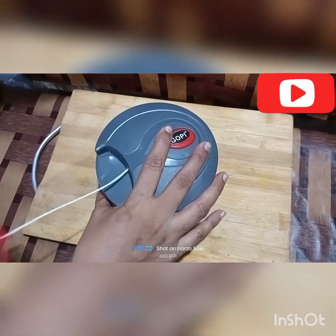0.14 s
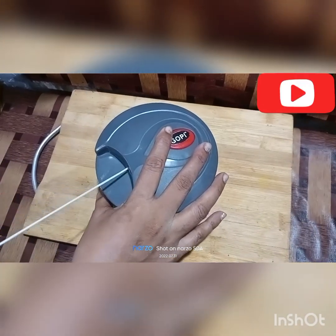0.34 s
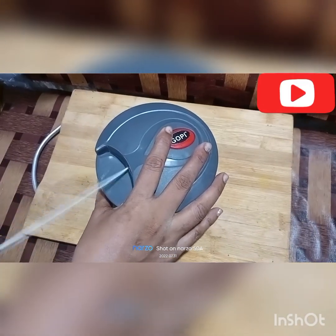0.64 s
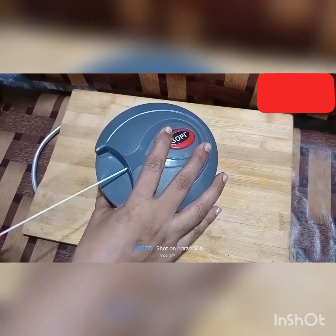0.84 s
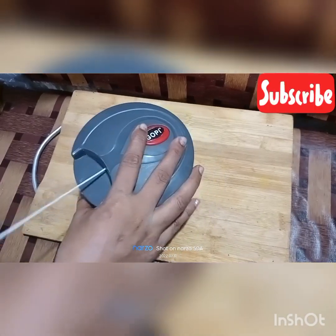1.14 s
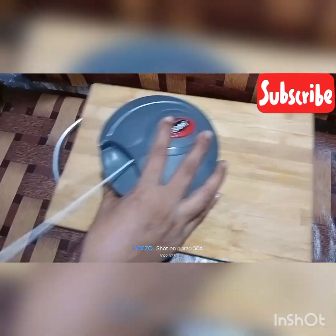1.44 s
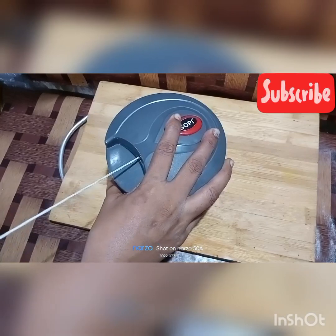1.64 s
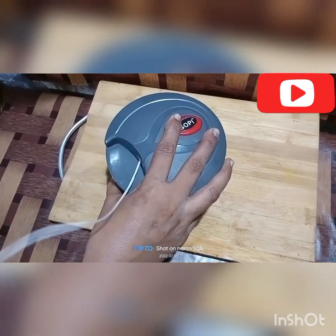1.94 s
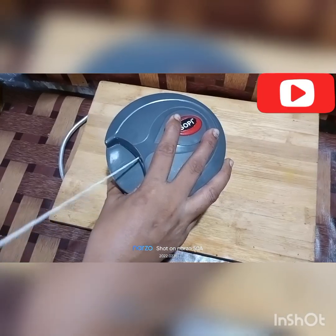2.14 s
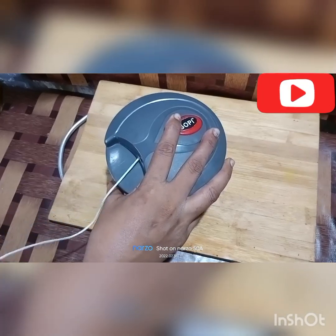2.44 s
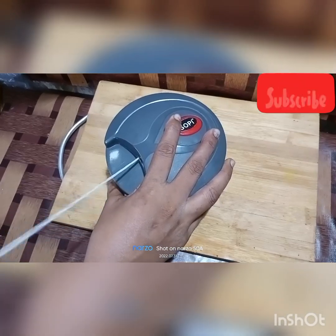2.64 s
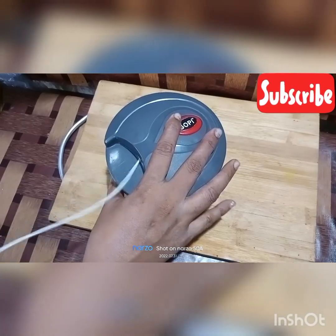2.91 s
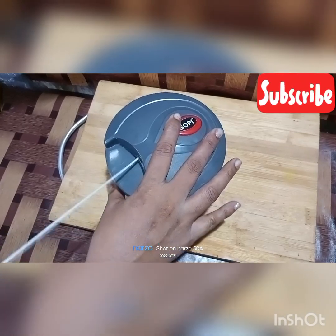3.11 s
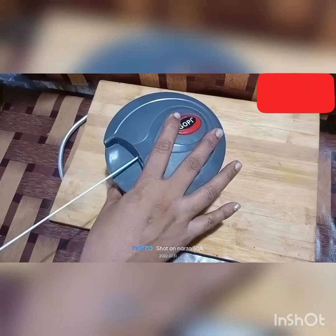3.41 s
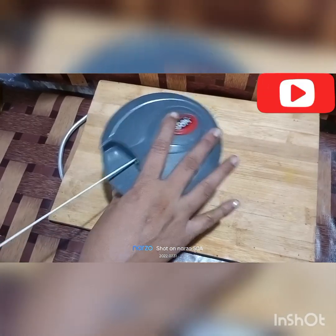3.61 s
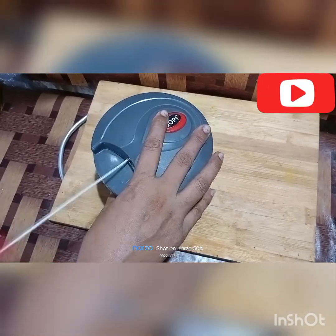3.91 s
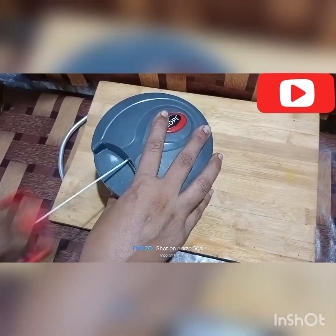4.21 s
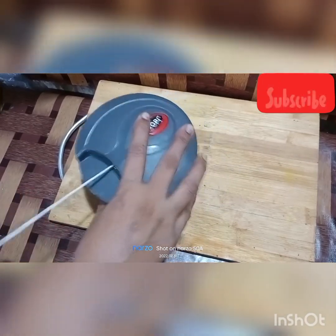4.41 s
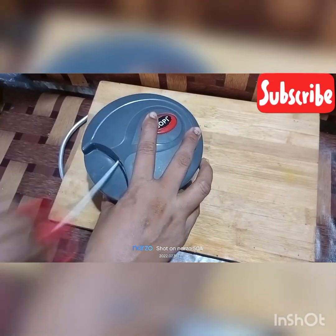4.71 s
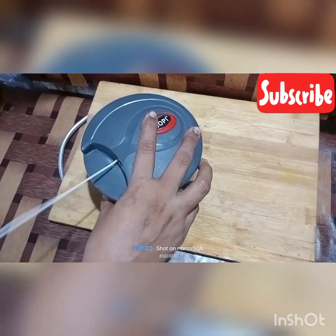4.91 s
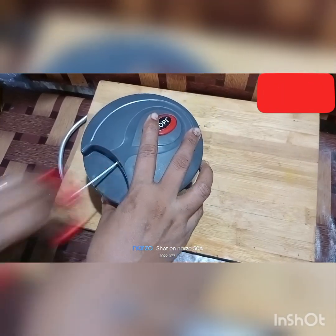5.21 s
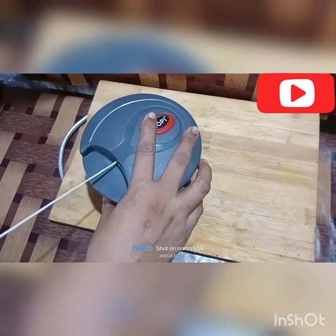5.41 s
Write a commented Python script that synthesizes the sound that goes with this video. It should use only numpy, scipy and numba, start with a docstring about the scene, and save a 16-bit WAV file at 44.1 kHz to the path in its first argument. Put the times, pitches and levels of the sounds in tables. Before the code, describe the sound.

Heard very close in a quiet kitchen, a pull-cord chopper spins in short uneven bursts. Hard pieces rattle and knock inside the plastic bowl, blades swish and tick brightly, and the bowl bumps a wooden board with low thuds. Small cord squeaks appear between pulls. The middle is sparser, then knocks strengthen and steel rings briefly near the end. Dry mono sound, faint room hiss and hum.

```python
"""A pull-cord chopper with a plastic bowl, heard from close by on a wooden board in a quiet kitchen.
From the first moment bursts of spin rattle pieces in the bowl, with knocks, ticks and swishing blades.
Soon the bowl rocks and bumps on the board and the cord squeaks; past the middle the steel rings faintly,
and near the end it rings loudest. Noise-driven resonators make the rattle, rumble, swish and room tone;
decaying sines and noise make the blows; gliding partials make the squeaks."""
import sys
import numpy as np
from scipy import signal
from scipy.fft import rfft, irfft
from scipy.io import wavfile
from scipy.ndimage import uniform_filter1d
from numba import njit

SR = 44100
rng = np.random.default_rng(int(sys.argv[2]) if len(sys.argv) > 2 else 0)


def store_wav(level_fs):
    """Save 16-bit WAV to argv[1]."""
    pcm = np.round(np.clip(np.atleast_2d(level_fs), -1, 1) * 32767)
    wavfile.write(sys.argv[1], SR, pcm.T.astype(np.int16))


N = 244755

# Bursts of spin as the cord is pulled or let back. Each row: time of full speed in seconds, run-up in
# seconds, hold in seconds, then rattle, swish and top swish levels in dB.
SPINS = [(0.03, 0.088, 0.019, -45, -50, -60), (0.28, 0.015, 0.09, -43.5, -55, -63),
         (0.413, 0.024, 0.032, -56.5, -66.5, -71), (0.544, 0.081, .003, -50, -61, -72),
         (0.597, 0.029, .035, -38.5, -43.5, -49), (0.681, 0.01, 0.0029, -39, -41, -54),
         (0.84, 0.038, 0.013, -54.5, -59, -80), (0.906, .06, 0.024, -49, -44.5, -52),
         (0.993, 0.025, 0.03, -66, -55, -68), (1.165, 0.05, 0.01, -46, -48.5, -63),
         (1.365, 0.12, 0.033, -72, -62.5, -61), (1.426, 0.019, 0.0071, -38, -40, -49),
         (1.466, .02, 0.073, -42, -56, -66), (1.676, 0.035, .003, -50, -64, -67),
         (1.99, .03, 0.036, -46.5, -57, -59), (2.061, 0.043, .003, -67, -56, -72),
         (2.2, .05, 0.039, -52.5, -59.5, -68), (2.56, 0.1, 0.049, -53.5, -57, -63),
         (2.627, 0.041, 0.056, -69, -59.5, -63), (2.785, 0.1, 0.015, -57.5, -57, -66),
         (3.069, 0.029, 0.054, -48, -54.5, -60), (3.14, .02, .003, -58, -57, -60),
         (3.295, 0.087, 0.092, -51.5, -58.5, -59), (3.371, 0.12, 0.073, -48.5, -49, -55),
         (3.605, 0.039, 0.054, -59, -65.5, -71), (3.737, 0.14, .012, -58, -52.5, -54),
         (3.848, 0.084, .003, -51.5, -60, -75), (3.882, .02, 0.051, -44.5, -40.5, -53),
         (3.955, 0.023, 0.0027, -44.5, -56.5, -55), (4.076, .025, 0.039, -72, -58, -74),
         (4.178, 0.062, .003, -51, -54.5, -66), (4.458, 0.13, 0.0025, -53, -57, -63),
         (4.669, 0.031, 0.037, -58, -64, -69), (4.752, 0.059, 0.0039, -46.5, -52, -65),
         (4.934, 0.052, 0.021, -41, -46, -52), (4.995, 0.022, 0.026, -51, -58, -70),
         (5.167, 0.059, 0.03, -57, -67, -75), (5.204, 0.018, 0.097, -45, -52.5, -58),
         (5.436, 0.023, .003, -75, -58.5, -76), (5.476, 0.018, 0.048, -34.5, -45.5, -54)]
RUN_UP_DB = 25  # climb over one run-up time
# Rates at which a coasting burst dies. In order: rattle, swish and top swish, in dB per second.
COAST_DB_PER_S = [325, 392, 328]
# The bowl rocks on the board. Each row: time of full level in seconds, hold in seconds, level in dB,
# rumble centre in Hz.
ROCKS = [(.004, 0.0089, -56, 201), (0.04, 0.017, -53.5, 208), (0.316, 0.069, -43, 246),
         (0.417, 0.018, -46.5, 210), (.547, .02, -48.5, 232), (0.593, 0.026, -40, 286),
         (0.667, 0.034, -44.5, 186), (0.76, 0.048, -56, 155), (.92, 0.015, -52, 200),
         (1.18, .003, -55, 347), (1.37, 0.025, -61, 200), (1.442, 0.084, -45.5, 256),
         (1.687, .003, -57, 268), (1.999, 0.052, -45, 282), (2.213, 0.081, -50.5, 181),
         (2.386, .003, -59, 187), (2.564, 0.025, -45, 193), (2.653, .045, -52, 356),
         (2.772, 0.037, -47, 210), (2.865, .13, -60, 171), (3.085, 0.032, -42, 315),
         (3.294, 0.046, -45, 198), (3.39, 0.066, -57, 200), (3.508, 0.063, -50.5, 170),
         (3.727, .003, -59.5, 243), (3.875, .003, -49.5, 276), (3.95, .012, -48, 242),
         (4.138, 0.089, -59, 273), (4.424, .03, -61, 249), (4.673, .02, -54, 238), (4.75, 0.0038, -46, 344),
         (4.918, 0.07, -51, 242), (5.191, 0.098, -51, 360), (5.433, 0.018, -44, 267),
         (5.483, 0.046, -34.5, 290)]
ROCK_RISE_S, ROCK_FALL_DB_PER_S = 0.051, 276
ROCK_RATTLE_DB = -18.5  # lowest bowl modes relative to the rumble
# Resonant modes of the bowl. Each row: frequency in Hz, width in Hz, relative level in dB.
BOWL = [(625.4, 40, -10), (714.7, 50.5, -2), (800.3, 45, -1.5), (972, 41, -9), (1124, 350, -7.5),
        (1256, 18, -5), (1388, 120, -5.5), (1600, 176, -3), (1696, 88, -3), (1931, 120, -10.5),
        (2114, 110, -11), (2334, 14, -22)]
# Resonant modes of the board. Each row: frequency in Hz, width in Hz, relative level in dB before
# weighting by distance from the rumble centre.
BOARD = [(65, 25, -21), (104, 18, -0.5), (143.4, 5.7, -1.5), (193.9, 18.2, 1), (288.3, 21, -4.5),
         (361.6, 27, 1.5), (389, 6.7, -8.5)]
# Spectral shape of the swish. Each row: frequency in Hz, relative density in dB per Hz.
SWISH = [(1800, -23), (2400, 2), (3140, 4), (4300, 3), (4700, 0), (5400, 7.5), (7300, 5.5), (8000, -3.5),
         (8900, 7.5), (10200, -23.5), (14000, -9)]
# Pieces knock the bowl. Each row: start in seconds, peak in dB, low ring in Hz, high ring in Hz,
# high ring in dB relative to the low ring.
KNOCKS = [(0.026, -38, 600, 1240, 10), (0.051, -30, 680, 1896, 14), (0.275, -28, 1090, 1696, 8.5),
          (0.319, -34, 680, 1670, 28), (0.411, -38.5, 647, 2280, 1), (0.548, -39.5, 805, 1700, -3),
          (0.597, -29, 757, 1690, -9), (0.63, -28.5, 701, 1330, -6), (0.679, -27.5, 593, 1580, 2),
          (0.845, -44.5, 588, 1630, 3), (0.927, -34, 578, 2290, 7), (1.133, -43.5, 803, 1706, 9),
          (1.423, -33, 770, 1270, 13), (1.466, -27.5, 733, 1250, 7), (1.507, -31.5, 740, 2040, 5),
          (1.54, -29, 704, 2190, 5), (1.675, -33, 706, 1760, -3), (1.973, -38, 765, 1676, 7),
          (2.238, -39, 710, 1675, -15), (2.55, -38.5, 760, 1245, 2), (2.75, -43.5, 750, 1170, 5),
          (2.793, -34.5, 805, 1620, -8), (3.101, -30, 790, 1190, -22), (3.33, -41.5, 783, 1630, -13),
          (3.371, -36, 742, 1250, -2), (3.668, -42.5, 611, 1355, -10), (3.829, -46, 696, 1310, -13),
          (3.874, -30, 1000, 1285, 1), (4.165, -40, 702, 1670, 0), (4.733, -34, 505, 1280, -11.5),
          (4.904, -32, 550, 1630, 4.5), (5.175, -42, 595, 1300, -16), (5.201, -26, 566, 1800, 7.5),
          (5.281, -22.5, 555, 1950, -6.5), (5.475, -24, 662, 1920, 3)]
# Decay time of a -30 dB blow, and how many dB harder halve it.
KNOCK_T60_S, KNOCK_HALVING_DB = 0.084, 21
TICK_T60_S, TICK_HALVING_DB = 0.02, 25
# Blades tick on hard bits. Each row: start in seconds, peak of the body in dB, top band in dB relative to
# the main body band, body centre in Hz.
TICKS = [(0.0172, -39.5, 5, 4530), (0.596, -34, -4, 5200), (0.606, -31.5, 7, 8740), (0.631, -29, -20, 4900),
         (0.6804, -32, -18, 7700), (0.6877, -24.5, -1.5, 5500), (0.8455, -37, -32, 7100),
         (0.8983, -21.5, 6.5, 6900), (0.9223, -31.5, -13, 5200), (1.157, -39.5, -11, 5660),
         (1.4244, -34, -22, 8300), (3.049, -48, -7, 5560), (3.148, -45, -4, 6150), (3.2976, -29.5, 8, 7550),
         (3.378, -31, -8, 5700), (3.41, -23, 10, 7760), (3.878, -34, -15, 5050), (3.923, -37, 12, 8800),
         (4.1633, -29, -34, 5920), (4.7344, -46, -11, 5500), (4.904, -37, -15, 6260),
         (4.9313, -22, 2, 7660), (5.0145, -44, -23, 5940), (5.064, -44.5, -24, 7900),
         (5.2102, -24, 4.5, 7420), (5.476, -41, -7, 5500), (5.5029, -26, 13.5, 7420)]
# The bowl bumps the board. Each row: start in seconds, level before the rise and fall in dB,
# frequency in Hz, decay time t60 in seconds.
THUDS = [(0.308, -35, 216, 0.13), (0.544, -36, 194, 0.1), (0.595, -30, 264, 0.094), (1.471, -38, 365, 0.16),
         (2.002, -36, 356, 0.23), (2.214, -40.5, 190.4, 0.25), (2.539, -34.5, 192, 0.37),
         (2.651, -27.5, 336, 0.11), (3.075, -34, 358, 0.12), (3.494, -36.5, 198, 0.1),
         (3.933, -38.5, 107, 0.15), (5.433, -30.5, 257, 0.072)]
# Cord squeaks and groans. Each row: start in seconds, length in seconds, first and last frequency in Hz,
# level in dB, second and third partials in dB relative to the first.
SQUEAKS = [(0.835, 0.023, 3860, 3720, -49, -23, -7.5), (0.988, 0.078, 584, 644, -53, -15, -34),
           (1.682, 0.051, 880, 930, -48.5, -11, -22), (2.09, 0.011, 4000, 3860, -50, -8, -27),
           (2.423, 0.082, 953, 1057, -66, -22, -30), (2.462, .05, 696, 680, -62, -20, -30),
           (3.151, 0.015, 2820, 3740, -55, -7, -28), (3.417, 0.063, 774, 821, -52, -2, -11),
           (3.705, 0.0079, 3790, 3520, -44.5, -22, -7), (3.708, 0.02, 3270, 3270, -36, -13, -9.5),
           (3.725, 0.0068, 3220, 2780, -41.5, -16, -17), (5.062, 0.014, 2010, 1830, -39, -20, -26)]
# Steel modes of the blade set, in three pairs. Each row: frequency in Hz, t60 in seconds of the rest
# of the ring before it is stopped.
STEEL = [(4282, 0.36), (4377, 0.57), (8608, 0.12), (8780, 0.19), (11520, 0.18), (11750, 0.21)]
# The steel is struck. Each row: start in seconds, push in seconds, then the level in dB of each tone in
# the low, middle and high pairs.
RINGS = [(5.313, 0.0099, -27, -38, -47), (5.281, .009, -66, -66, -41.5), (3.13, 0.012, -74, -75, -48.5)]
# Spectral shape of the room tone. Each row: frequency in Hz, relative density in dB per Hz.
KITCHEN = [(15, -64), (25, -72), (49, -6), (90, -3), (149, 5), (170, -7.5), (217, 5.5), (263, -4),
           (384, 1.5), (607, -7), (936, -4.5), (1160, -7), (4140, -19.5), (8800, -21.5), (10200, -33.5),
           (13600, -32.5), (16000, -11.5)]
KITCHEN_DB = -63
MIC_TOP_HZ, TOP_HZ = 15850, 17100  # passband edges of microphone and recorder


def spin():
    """Common excitation: one stream of impacts drives rattle and swish, while rocking drives the rumble."""
    s, rise_s, hold_s, *layer_db = np.transpose(SPINS)[:, :, None]
    gains = []
    for db, fall in zip(layer_db, COAST_DB_PER_S):
        gains.append(stretch(burst(s, rise_s, hold_s, db, fall).max(axis=0)))
    s, hold_s, rock_db, rock_hz = np.transpose(ROCKS)[:, :, None]
    rocks = burst(s, ROCK_RISE_S, hold_s, rock_db, ROCK_FALL_DB_PER_S)
    centre = rock_hz[rocks.argmax(axis=0), 0]  # the strongest rock sets the pitch
    centre = stretch(uniform_filter1d(centre, size=15))
    pieces = grains(700, 2, .9)
    rattle, low_modes = bowl_rattle(pieces)
    rumble = board_rumble(centre) + undb(ROCK_RATTLE_DB) * low_modes
    scrape = pieces + grains(330, 5.6, 0.33)
    out = gains[0] * rattle + gains[1] * blade_swish(scrape) + gains[2] * top_swish(scrape)
    return out + stretch(rocks.max(axis=0)) * rumble


def bowl_rattle(pieces):
    """Modal resonance: impacts excite the bowl modes; returns the whole rattle and its lowest three modes."""
    modes = [undb(db) * flutter(pieces, hz, width, 6.5, 35) for hz, width, db in BOWL]
    broad = narrow(pieces, 1005., 890., 1005., 890.)
    rattle = unit(sum(modes)) + undb(-14) * broad
    return unit(rattle), unit(sum(modes[:3]))


def board_rumble(centre):
    """Selective excitation: rocking drives most the board modes nearest the moving rumble centre."""
    rumble, power = 0, 0
    for hz, width, db in BOARD:
        octaves = abs(np.log2(hz / centre))
        rumble = rumble + undb(db - 10.5 * octaves) * flutter(rng.standard_normal(N), hz, width, 2.9, 14)
        power = power + undb(db - 11 * octaves) ** 2
    return unit(rumble / np.sqrt(power))  # hold the level as the centre moves


def blade_swish(scrape):
    """Band-limited friction: blades and lid parts each fizz in their own narrow patch of treble."""
    patches = 0
    for hz in np.geomspace(2400, 13500, num=30):
        patches = patches + np.sqrt(hz) * flutter(scrape, hz, hz / 22, 7.8, 40)
    return colour(patches, SWISH) * undb(2 * walk(52))


def top_swish(scrape):
    """Band-limited friction: the same scrape in one flickering band at the very top."""
    return narrow(scrape, 15400., 1400., 15100., 2200.) * undb(3 * walk(50))


def knocks():
    """Impulse response: a blow rings all bowl modes and two pitches of its own, with a short crack."""
    out, t = np.zeros(N), np.arange(int(.25 * SR)) / SR
    hz, _, db = np.transpose(BOWL)[:, :, None]
    for s, peak_db, low_hz, high_hz, high_db in KNOCKS:
        t60 = harder(KNOCK_T60_S, peak_db, KNOCK_HALVING_DB)
        # each blow shares itself out among the modes at random
        share = undb(db - 13 + (hz > 1150) * high_db + 10.2 * rng.standard_normal(hz.shape))
        modes = share * np.sin(2 * np.pi * (hz * t + rng.random(hz.shape)))
        ring = np.sum(modes, axis=0) + np.sin(2 * np.pi * low_hz * t)
        high = undb(high_db) * np.sin(2 * np.pi * high_hz * t)
        crack = undb(high_db) * band(rng.standard_normal(len(t)), 2170., 1770.)
        sound = ring * fade(t, t60, 0.0012) + high * fade(t, 0.43 * t60, 0.00015)
        sound += crack * fade(t, 0.027, 0.00017)
        add(out, s, undb(peak_db) * sound / np.max(abs(sound)))
    return out


def ticks():
    """Brief contact: a short broadband impact gives a sharp bright crack with a thin fizzing tail."""
    out, t = np.zeros(N), np.arange(int(.15 * SR)) / SR
    for s, peak_db, top_db, hz in TICKS:
        t60 = harder(TICK_T60_S, peak_db, TICK_HALVING_DB)
        body_noise, top_noise = rng.standard_normal((2, len(t)))
        body = narrow(body_noise, hz, 870., hz, 2100.)
        body += .5 * narrow(body_noise, 6850., 3500., 6850., 3500.)
        top = narrow(top_noise, 15400., 1800., 15200., 2600.)
        shape = fade(t, t60, .0003) + undb(-18) * fade(t, 5 * t60, .002)
        sound = shape * (body + undb(top_db) * top)
        add(out, s, undb(peak_db) * sound / np.max(abs(shape * body)))
    return out


def thuds():
    """Damped oscillation: bowl and board meet in a low decaying sine."""
    out, t = np.zeros(N), np.arange(int(.3 * SR)) / SR
    for s, level_db, hz, t60 in THUDS:
        add(out, s, undb(level_db) * np.sin(2 * np.pi * hz * t) * fade(t, t60, 0.0073))
    return out


def squeaks():
    """Stick-slip of the cord: a rough gliding stack of three partials with a fuzzy tail."""
    out, t = np.zeros(N), np.arange(int(.15 * SR)) / SR
    for s, length, hz0, hz1, db, *upper_db in SQUEAKS:
        u = np.linspace(0, 1, int(length * SR))
        phase = 2 * np.pi * np.cumsum(hz0 + (hz1 - hz0) * u) / SR
        roughness = min(.25 + 6 * length, .7)
        for k, part_db in enumerate([0] + upper_db, 1):
            grip = 1 + roughness * unit(band(rng.standard_normal(len(u)), 60., 120.))
            partial = grip * np.sin(k * phase) * np.sin(np.pi * u) ** 0.51
            add(out, s, undb(db + part_db) * partial)
            fuzz = narrow(rng.standard_normal(len(t)), k * hz1, 0.11 * hz1, k * hz1, 0.22 * hz1)
            add(out, s + length / 2, undb(db + part_db - 17) * fuzz * fade(t, .14, .004))
    return out


def rings():
    """Forced, then free vibration: a push swells the steel; most is damped, a wavering rest soon stops."""
    out, t = np.zeros(N), np.arange(int(.3 * SR)) / SR
    for s, push, *pair_db in RINGS:
        for k, (hz, t60) in enumerate(STEEL):
            swell = np.where(t < push, (t / push) ** 1.45, np.exp(-(t - push) / 0.0028))
            rest = undb(-16.5) * np.minimum(t / push, 1) * 1000. ** (-t / t60)
            rest *= np.clip((.13 - t) / 0.015, 0, 1)  # the pieces stop it
            # loose pieces brush the blades and roughen the ring
            rough = unit(band(rng.standard_normal(len(t)), hz, 85.))
            tone = np.sin(2 * np.pi * (hz * t + rng.random()))
            sound = swell * tone + rest * (.5 * tone + .5 * rough)
            add(out, s, undb(pair_db[k // 2]) * sound)
    return out


def kitchen():
    """Shaped noise: quiet room hiss and hum; every half octave wavers by itself, the bass most."""
    air = rng.standard_normal(N)
    bands = 0
    for hz in np.geomspace(30, 16000, num=19):
        depth_db = 7 if hz < 150 else 2.5
        bands = bands + np.sqrt(hz) * flutter(air, hz, hz / 3, depth_db, 8)
    return undb(KITCHEN_DB) * colour(bands, KITCHEN)


def grains(per_s, spread_db, smooth):
    """Granular impacts: uneven hits, each a crackle fading in about 2.5 ms, over a bed of friction noise."""
    hit_draw, size_draw = rng.random((N, 2)).T
    hits = (hit_draw < per_s / SR) * undb(-spread_db * np.log(1 - size_draw))
    crackle = signal.lfilter([1], [1, -np.exp(-1 / (0.0025 * SR))], hits)
    return (unit(crackle) + smooth) * rng.standard_normal(N)


def flutter(x, hz, width_hz, depth_db, rate):
    """Resonance under uneven drive: one mode excited by x, its level wandering at random."""
    return undb(depth_db * walk(rate)) * unit(band(x, float(hz), float(width_hz)))


def burst(s, rise_s, hold_s, peak_db, fall_db_per_s):
    """Exponential growth and decay: one row of gains per burst, in steps of 44 samples, about 1 ms."""
    t = np.arange(N // 44 + 2) * 44 / SR
    rise_db = RUN_UP_DB * np.maximum(s - t, 0) / rise_s
    fall_db = fall_db_per_s * np.maximum(t - s - hold_s, 0)
    return undb(peak_db - rise_db - fall_db)


def stretch(steps):
    """Linear interpolation from steps of 44 samples to single samples."""
    return np.interp(np.arange(N) / 44, np.arange(len(steps)), steps)


def harder(t60, peak_db, halving_db):
    """Level-dependent damping: harder blows die sooner."""
    return t60 * 2 ** (-(peak_db + 30) / halving_db)


def fade(t, t60, rise_s):
    """Exponential damping after a quick rise."""
    return (1 - np.exp(-t / rise_s)) * 1000. ** (-t / t60)


def walk(rate):
    """Random modulation: values held for 1 / rate seconds and smoothed twice over that time."""
    k = int(SR / rate)
    held = np.repeat(rng.standard_normal(N // k + 1), k)
    return uniform_filter1d(uniform_filter1d(held, k), k)[:N]


@njit
def band(x, hz, width):
    """Second-order resonance: a state-variable band-pass with gain 1 at the centre."""
    y, b, l = np.empty(len(x)), 0., 0.  # b and l are the band and low states
    g, k = np.tan(np.pi * hz / SR), width / hz
    for i in range(len(x)):
        v = (b + g * (x[i] - l)) / (1 + g * (g + k))
        b, l, y[i] = 2 * v - b, l + 2 * g * v, k * v
    return y


def narrow(x, hz1, width1, hz2, width2):
    """Cascaded resonance: two band-passes in series, scaled to rms 1."""
    return unit(band(band(x, hz1, width1), hz2, width2))


def colour(x, spectrum):
    """Spectral shaping: weights x by (Hz, dB) points joined on a log frequency axis, at rms 1."""
    hz, db = np.transpose(spectrum)
    f = np.maximum(np.arange(len(x) // 2 + 1) * SR / len(x), 1)
    gain = undb(np.interp(np.log(f), np.log(hz), db, left=-90, right=-90))
    return unit(irfft(rfft(x) * gain, len(x)))


def undb(db):
    """Decibel law: level in dB to amplitude gain."""
    return 10 ** (np.asarray(db) / 20)


def unit(x):
    """Normalisation to rms 1."""
    return x / np.sqrt(np.mean(x ** 2))


def add(out, s, sound):
    """Superposition: mixes a sound in at s seconds."""
    i = int(s * SR)
    out[i:i + len(sound)] += sound[:N - i]


def scene():
    """Superposition of all sources, close and without reverberation."""
    return (spin() + knocks() + ticks() + thuds() + squeaks() + rings() + kitchen())[None]


def record(dry):
    """Band limiting: steep low-passes of the microphone and then the recorder cut the top."""
    mic = signal.sosfilt(signal.ellip(8, .3, 45, MIC_TOP_HZ, fs=SR, output="sos"), dry)
    return signal.sosfilt(signal.ellip(8, .2, 60, TOP_HZ, fs=SR, output="sos"), mic)


dry = scene()
out = record(dry)
store_wav(out)
```